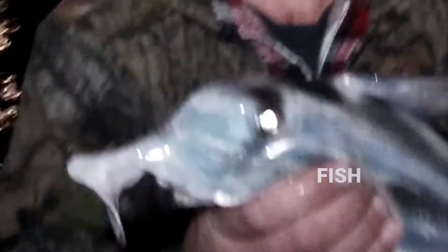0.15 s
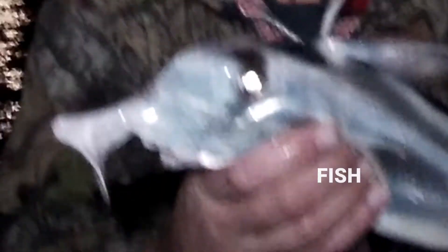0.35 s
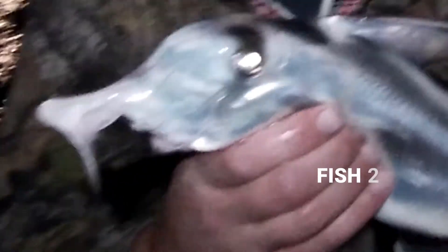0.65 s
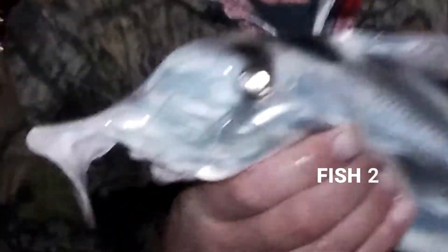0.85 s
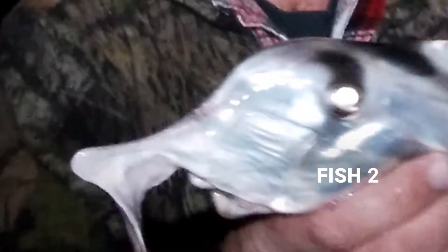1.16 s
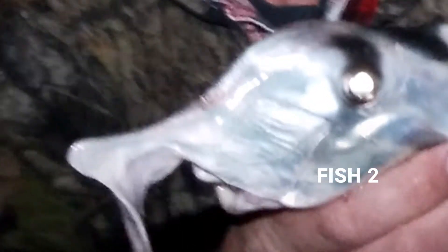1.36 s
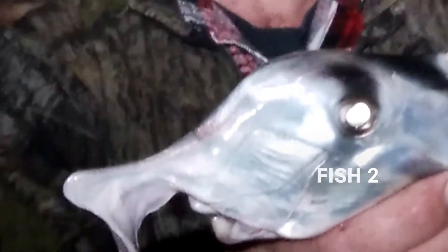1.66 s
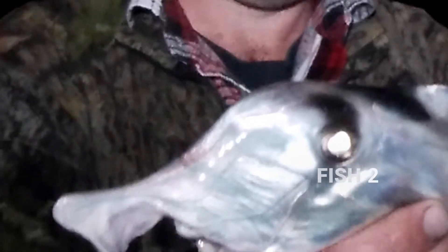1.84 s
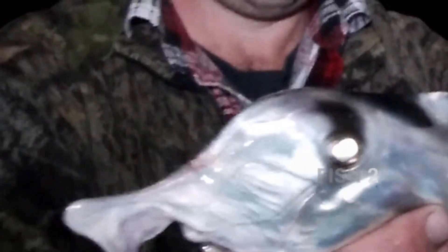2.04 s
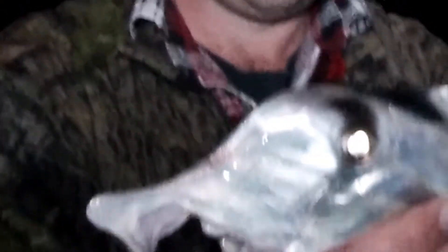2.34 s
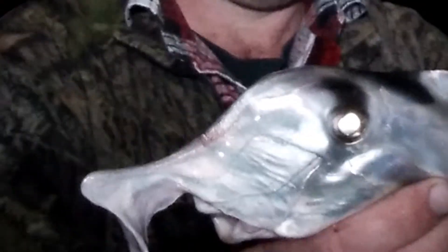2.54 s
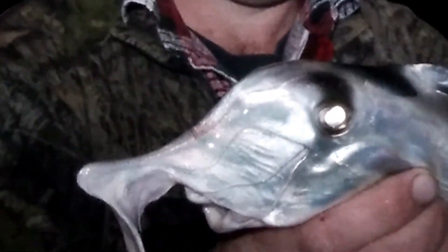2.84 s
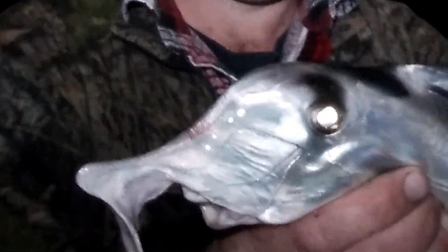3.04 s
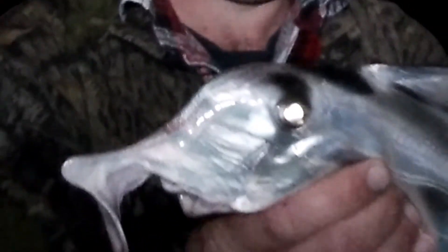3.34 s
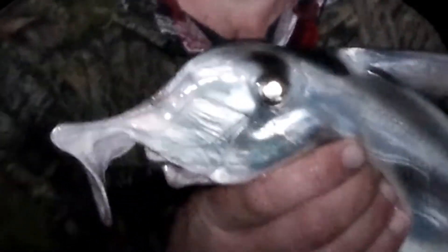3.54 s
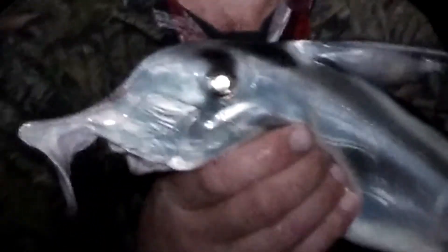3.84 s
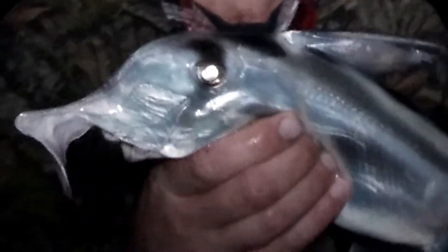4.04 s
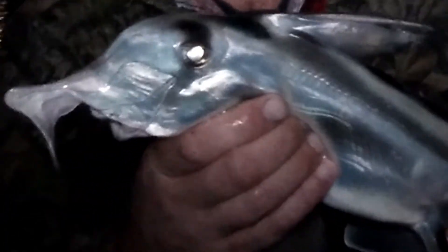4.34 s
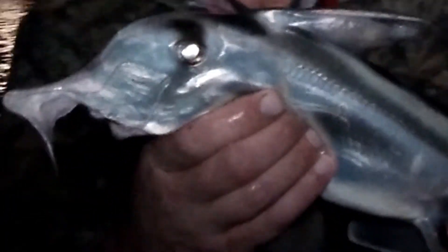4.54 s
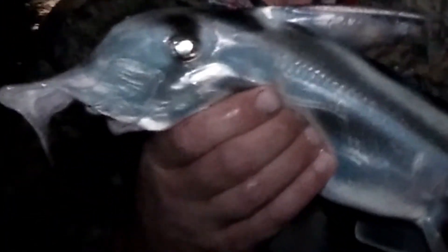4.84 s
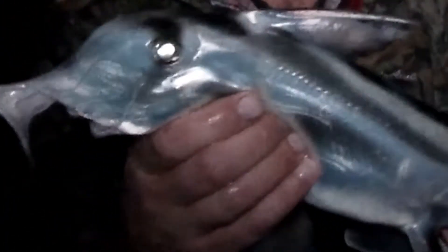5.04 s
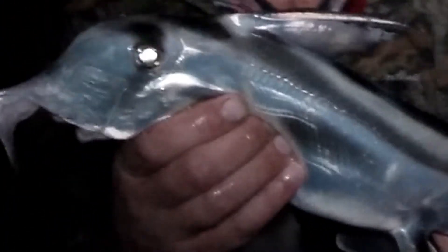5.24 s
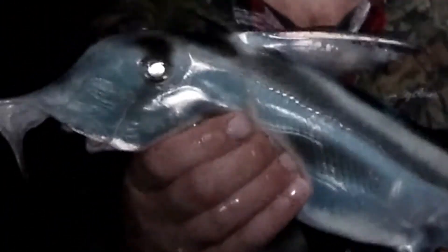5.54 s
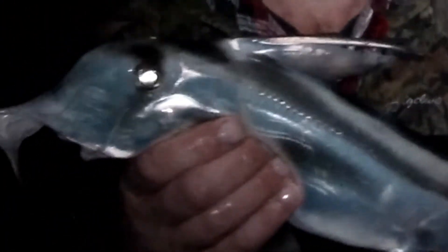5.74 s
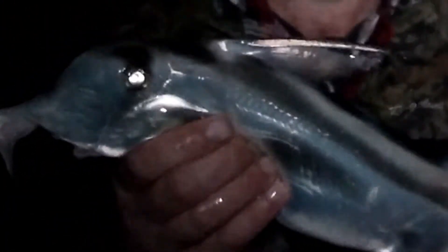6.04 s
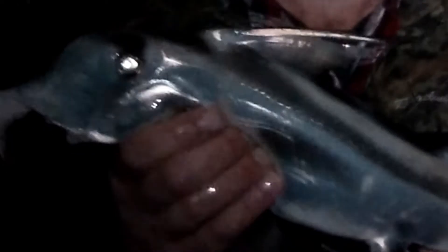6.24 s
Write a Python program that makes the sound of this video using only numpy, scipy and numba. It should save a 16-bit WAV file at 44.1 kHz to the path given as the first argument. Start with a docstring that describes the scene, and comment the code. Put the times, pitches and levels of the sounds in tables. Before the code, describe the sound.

Close wavelets fizz, plop and slap against shore stones; a low boomy rumble grows underneath until it dominates the second half.

```python
"""Shallow water laps over a pebble shore, heard close up on a small microphone: noise wash, hissing foam.
Swarms of small ringing bubbles fizz and run back over the pebbles; single air pockets plop, many upward
in pitch. Drops tick on stone as clusters of short rings, wavelets slap as spray, crack and hollow thud.
Behind them low-band noise is wind on the microphone, and resonant noise a deep rumble that swells and stays."""
import sys
import numpy as np
from scipy import signal
from scipy.fft import rfft, irfft
from scipy.io import wavfile
from scipy.ndimage import uniform_filter1d
from numba import njit

SR = 44100
rng = np.random.default_rng(int(sys.argv[2]) if len(sys.argv) > 2 else 0)


def wrap_up_sound(samples):
    """Save the sound to the file named by the first command line argument, as 16-bit audio."""
    columns = np.atleast_2d(samples).T
    # keep every value between -1 and 1, then stretch to whole-number steps
    tamed = np.clip(columns, -1, 1)
    steps = np.round(tamed * 32767).astype(np.int16)
    wavfile.write(sys.argv[1], SR, steps)


N = 281799


def water():
    """Wavelets wash and gurgle under finer foam; quick random surges lift both."""
    # wash as the wavelets come and go, before surges: (t/s, level/dB)
    wash_levels = [(0, -44.5), (.3, -43), (.75, -46), (1.3, -46.5), (1.55, -46), (1.96, -47), (2.4, -45),
                   (2.85, -45), (3.4, -46), (3.95, -47.5), (4.27, -50.5), (4.86, -51), (5.1, -46.5),
                   (5.38, -50), (5.75, -50.5), (6.1, -48), (6.39, -48)]
    # filter responses of wash and foam: (f/Hz, level/dB)
    wash_colour = [(150, -32.5), (260, 1), (480, -5.5), (780, -1), (1100, -3.5), (1550, -2), (2200, -5),
                   (3000, -10.5), (4200, -30), (7700, -38)]
    foam_colour = [(1500, -24), (2600, -14), (3200, 5.5), (4300, 2.5), (7500, 0), (9000, -1), (15000, -5)]
    surge_db = 0.15 * walk(9) + 1.51 * walk(45)

    body = hiss(180, 8000, 0.73)
    body += undb(-1.0) * fizz(count=3500, lo_hz=400.8, hi_hz=4944, cycles=30.0, spread_db=1.0, glide=0.0063)
    # larger pockets of air ring longer and slide up as they rise
    body += undb(-14.5) * fizz(count=250, lo_hz=544.7, hi_hz=1895, cycles=95, spread_db=3.0, glide=0.00867)
    foam = hiss(2400, 17000, 1.0)
    foam += fizz(count=5000, lo_hz=2440, hi_hz=13530, cycles=43.0, spread_db=3.0, glide=0.007)

    wash_db = curve(wash_levels)
    # foam is -51.5 dB at a wash of -46 dB and moves 1.31 dB per dB of wash
    foam_db = -51.5 + 1.31 * (wash_db + 46)
    wash = undb(wash_db + surge_db) * unit(shape(body, wash_colour))
    return wash + undb(foam_db + 1.17 * surge_db) * unit(shape(foam, foam_colour))


def hiss(lo_hz, hi_hz, flicker_db):
    """Half-octave noise bands, each flickering alone."""
    out = 0
    for hz in np.exp(np.arange(np.log(lo_hz), np.log(hi_hz), np.log(2) / 2)):
        band = unit(svf(rng.standard_normal(N), hz, hz / 2))
        # the root of the pitch keeps the power per Hz even
        out = out + np.sqrt(hz) * undb(flicker_db * walk(6.8)) * band
    return unit(out)


def fizz(count, lo_hz, hi_hz, cycles, spread_db, glide):
    """A swarm of bubbles of many sizes, each a short ring; a few are much louder than the rest."""
    when, pitch, loud, length = rng.random((count, 4)).T
    hz = lo_hz * (hi_hz / lo_hz) ** pitch
    size = undb(-spread_db * np.log(1 - .995 * loud)) * hz
    ring_s = cycles * (.5 + length) / hz
    return unit(rings(when * N / SR, size, hz, glide * hz * length, ring_s, rise=0.00026, hold=1.13))


def backwash():
    """Thin sheets of water run back over the pebbles: dense small bubbles round one pitch swell and ebb."""
    # runs: (t/s, length/s, level/dB, f/Hz)
    sheets = [(0.065, 0.51, -52.5, 2960), (1.397, 0.23, -51, 7300), (1.55, 0.6, -59, 4700),
              (3.34, 0.19, -50.5, 3240), (5.756, 0.86, -57, 3540)]
    width_hz, edge_s = 1100., 0.12
    t = np.arange(N) / SR
    bubbles = fizz(count=10000, lo_hz=2000, hi_hz=9160, cycles=25.0, spread_db=2.0, glide=0.0054)
    out = np.zeros(N)
    for start, length, db, hz in sheets:
        swell = np.clip(np.minimum(t - start, start + length - t) / edge_s, 0, 1)
        out += undb(db) * swell * unit(svf(bubbles, 1. * hz, width_hz))
    return out


def plops():
    """Air pockets open with a short wet smack and ring, most upward; the churning surface makes them warble."""
    # air pockets: (t/s, level/dB before the warble, f/Hz, glide/octaves per s, ring/s to -60 dB)
    pockets = [(0.15, -33, 1270, 0, .03), (.235, -41, 725, 4.5, 0.16), (0.286, -31, 3070, 3, 0.02),
               (.345, -38, 704, -1, 0.046), (0.367, -34, 1650, -12, 0.022), (.385, -37, 625, 2, 0.028),
               (.49, -31.5, 756, -3, 0.029), (.545, -30.5, 1410, -5, 0.015), (.623, -35, 660, 5, 0.083),
               (.742, -36.5, 640, 7.5, 0.12), (.849, -32.5, 1490, 1, 0.029), (1.723, -38, 507, 4, 0.13),
               (1.726, -33, 1270, 2, 0.022), (1.82, -30.5, 1415, 11, 0.033), (2.244, -36, 564, 33, 0.044),
               (2.76, -43, 648, -2, .05), (2.713, -29, 1020, -7, 0.021), (2.779, -32.5, 1405, 19.5, 0.065),
               (2.849, -35, 700, 3.5, 0.064), (2.91, -32, 2040, 4, 0.017), (2.925, -34, 1035, 24, 0.033),
               (2.994, -30, 533, 6.5, 0.067), (3.018, -38, 590, 21, 0.079), (3.055, -40, 990, -1, .045),
               (3.152, -35.5, 925, 3.5, 0.065), (3.194, -40.5, 775, 9.5, .07),
               (3.197, -38, 1150, 25.5, 0.048), (3.284, -34, 1375, 1, 0.029), (3.388, -41, 850, -2, 0.033),
               (3.418, -35, 1156, 4.5, 0.05), (3.448, -27, 1346, 3, 0.016), (3.417, -33, 2050, 0, 0.013),
               (3.475, -32, 2280, 15, .012), (3.528, -36, 1140, 10, .015), (3.464, -34, 893, 8, 0.086),
               (3.47, -35, 1330, 6, 0.047), (3.635, -39, 1406, 12, 0.051), (3.762, -35, 846, 11, 0.029),
               (4.05, -39, 810, 16, 0.037), (4.42, -35.5, 593, 20, 0.072), (4.523, -35, 645, 12, 0.042),
               (4.62, -36.5, 1740, 4, 0.015), (4.746, -35.5, 2200, 6, 0.011),
               (4.919, -34.5, 868, -1.5, 0.041), (4.938, -35, 940, 26, 0.025), (5.027, -35, 730, 3, 0.032),
               (5.081, -32, 1630, 8, 0.014), (5.146, -40, 400, 17, 0.14), (5.21, -38, 756, 4, .04),
               (5.225, -41, 1260, -3, 0.074), (5.335, -42, 710, 3.5, 0.098), (5.476, -28, 1190, 4, 0.0067),
               (5.648, -38, 2210, 6, 0.017), (5.86, -38, 910, 3, 0.02), (5.985, -38, 740, 9, 0.022),
               (6.0, -37, 820, 2, 0.025), (6.043, -32.5, 2250, 10, 0.016), (6.113, -33, 2160, -4, 0.016),
               (6.146, -36, 1480, 1, .03), (6.195, -35, 706, 9, 0.035), (6.21, -45, 846, 18.5, 0.17),
               (6.352, -44, 747, 20, 0.048), (5.5, -35.5, 1200, 5, 0.0092)]
    s, db, hz, glide, ring = np.transpose(pockets)
    smack = rings(s, undb(db - 10.5), 1.7 * hz, 0 * s, 0 * s + 0.0037, rise=0.00012, hold=1.5)
    warble = undb(2.4 * walk(130) - 4)
    return smack + warble * rings(s, undb(db), hz, glide, ring, rise=0.0005, hold=2.1)


def ticks():
    """Each drop on stone bursts into a few short rings scattered round its pitch, under a broad click."""
    # drops: (t/s, level/dB of the click, f/Hz)
    drops = [(.185, -34, 2500), (.415, -32.5, 2750), (.719, -37.5, 2820), (0.344, -34, 3680),
             (0.478, -38, 5600), (0.755, -37.5, 4600), (0.8937, -36, 6400), (0.9348, -30, 6900),
             (1.102, -36, 5540), (1.1828, -34.5, 5940), (1.2376, -36.5, 7250), (1.264, -31.5, 5560),
             (1.271, -35.5, 7200), (1.3517, -38.5, 7000), (1.4085, -29, 7300), (1.4205, -36, 7050),
             (1.459, -37.5, 4700), (1.516, -39, 7200), (1.657, -44, 6100), (1.927, -40, 4530),
             (1.964, -39.5, 8200), (1.9972, -39, 3860), (2.318, -44, 6900), (2.3563, -38, 8340),
             (2.626, -42, 7600), (2.7123, -36, 4270), (2.713, -38, 7800), (2.741, -46, 8500),
             (2.804, -35, 4270), (2.761, -36, 3030), (2.838, -34, 3180), (2.972, -35, 2630),
             (3.153, -32, 2600), (3.1183, -32.5, 3820), (3.16, -37.5, 5550), (3.2014, -39, 3830),
             (3.237, -32, 5900), (3.282, -31, 5100), (3.3103, -40.5, 4900), (3.391, -48, 4600),
             (3.399, -41, 4160), (3.417, -40, 3900), (3.518, -40, 3800), (3.4665, -38, 4070),
             (3.5367, -35.5, 3940), (3.5794, -38, 3500), (3.749, -30.5, 5940), (3.785, -37.5, 5800),
             (3.858, -33, 2200), (3.9843, -32.5, 4570), (4.0476, -36, 5500), (4.413, -40.5, 6000),
             (4.4813, -38, 3780), (4.5528, -38, 7600), (4.7464, -42, 5400), (4.8085, -38.5, 6350),
             (4.848, -33.5, 4380), (4.9245, -41.5, 6800), (4.954, -37, 3480), (5.0998, -37, 4200),
             (5.1574, -38, 4220), (5.567, -43, 3200), (5.582, -49, 3300), (5.7447, -41.5, 3200),
             (5.9684, -41, 3400), (5.9177, -38, 6950), (6.043, -39.5, 3740), (6.199, -36.5, 5200),
             (6.2418, -37.5, 3700)]
    s, db, hz = np.transpose(drops)
    steady = 0 * s
    c = rng.random((len(s), 8)).T
    out = rings(s, undb(db - 2.0), hz, steady, steady + 0.0078, rise=0.000092, hold=1.24)
    out += rings(s, undb(db), hz, steady, steady + 0.00086, rise=.0001, hold=2.05)  # click
    for k in range(4):
        late = s + 0.0065 * c[k]
        near_hz = hz * 2 ** (1.89 * (c[k + 4] - .5))
        out += rings(late, undb(db - 3.0), near_hz, steady, steady + 0.0059, rise=0.000089, hold=1.15)
    return out


def slaps():
    """A burst of spray, a crack if the blow is sudden, and the thud of the hollow that closes under it."""
    # wavelets on stones: (t/s, level/dB, hollow f/Hz, hollow level/dB re the slap, rise/s)
    blows = [(.135, -36, 703, -16, 0.014), (0.674, -29, 1670, -6, 0.00055), (.885, -31, 2020, -14, 0.016),
             (.933, -25, 1920, -17, 0.0023), (.911, -43, 583, 9, 0.0022), (.943, -23, 480, -7, 0.001),
             (.964, -24, 500, -7, 0.001), (1.045, -26, 520, -5, 0.0006), (1.1455, -19, 400, -5, 0.0004),
             (1.153, -29, 930, -6, 0.0012), (1.178, -28, 347, -11.5, 0.014),
             (1.47, -35.5, 1210, -18, 0.023), (1.866, -34, 1536, -9, 0.0048),
             (2.2485, -23, 774, -18.5, 0.001), (2.991, -35.5, 804, 5.5, 0.0014),
             (3.395, -40.5, 2000, -17, 0.046), (3.752, -31.5, 398, -18, 0.0012),
             (4.847, -26.5, 1900, -10, 0.00045), (4.886, -30, 686, -18, 0.0052),
             (5.083, -30.5, 600, -33, 0.0014), (5.123, -42, 318, 12, 0.0033), (5.445, -35, 930, -9, 0.011),
             (5.49, -36, 1006, -14, .008)]
    # filter response of the spray: (f/Hz, level/dB)
    spray_colour = [(200, -8.5), (450, 0), (1500, -3.5), (2300, -5), (3500, -16), (15000, -39.5)]
    out = np.zeros(N)
    spray = unit(shape(rng.standard_normal(N), spray_colour)) * undb(3 * walk(200))
    t = np.arange(int(.15 * SR)) / SR
    for s, db, hz, hollow_db, rise in blows:
        i = int(s * SR)
        fade_s = 0.018 + 14 * rise  # to -60 dB: a slap that rises slowly also dies slowly
        fade = np.minimum(t / max(rise, .0003), 1) * 1000. ** (-np.maximum(t - rise, 0) / fade_s)
        crack = np.cos(2 * np.pi * 1200 * t) * np.exp(-t / 0.00023) * np.exp(-rise / 0.003)
        hollow = undb(hollow_db) * np.sin(2 * np.pi * hz * t)
        out[i:i + len(t)] += undb(db) * fade * (undb(-9.5) * spray[i:i + len(t)] + crack + hollow)
    return out


def rumble():
    """Deep noise booming in fixed bands; all groups follow one swell, each between its own two levels."""
    # resonances: (f/Hz, width/Hz before boom() widens it, level/dB)
    boom_bands = [(71.6, 13.6, 1.5), (98.5, 17.4, -2), (129, 24, -1.44)]
    deep_bands = [(32.7, 18.4, -1), (50, 8.4, -19)]
    upper_bands = [(169.7, 23.6, -3.5), (191.9, 17.4, 0), (231.8, 32.5, -4.5), (270, 97, -15.5),
                   (312, 30, -15.5)]
    out = swelling(calm_db=-57.5, full_db=-23.5) * boom(boom_bands)
    out += swelling(calm_db=-55, full_db=-31) * boom(deep_bands)
    out += swelling(calm_db=-55, full_db=-37) * boom(upper_bands)
    return out


def boom(bands):
    """Noise through a few narrow resonances, each applied twice."""
    out = np.zeros(N)
    for hz, width, db in bands:
        wide = 1.43 * width  # the second pass narrows the band again
        once = svf(rng.standard_normal(N), 1. * hz, wide)
        out += undb(db) * unit(svf(once, 1. * hz, wide))
    return unit(out)


def swelling(calm_db, full_db):
    """Gain that moves from the calm to the full level as the rumble swells."""
    # the rumble swells up and stays: (t/s, share of the full swell)
    swell = [(0, 0), (1.2, 0.21), (2.0, 0.35), (2.35, 0.35), (2.7, 0.51), (3.05, 0.58), (3.6, 0.78),
             (4.05, 1), (4.7, 1.01), (5.1, 0.93), (5.4, 1), (6.39, 0.9)]
    return undb(calm_db + (full_db - calm_db) * curve(swell))


def wind():
    """Air pressing on the diaphragm, as noise round 10 Hz; its level falls while the rumble's level rises."""
    push = svf(svf(rng.standard_normal(N), 10.8, 7.1), 8.0, 23.0)
    return swelling(calm_db=-33, full_db=-45) * unit(push)


def undb(db):
    """Decibels to gain."""
    return 10 ** (np.asarray(db) / 20)


def unit(x):
    """Scale to rms 1."""
    return x / np.sqrt(np.mean(x ** 2))


def curve(table):
    """The second column of a table against time, one value per sample."""
    s, value = np.transpose(table)
    return np.interp(np.arange(N) / SR, s, value)


def walk(rate):
    """Random levels held 1 / rate s and smoothed twice; rms 1."""
    k = int(SR / rate)
    steps = np.repeat(rng.standard_normal(N // k + 1), k)
    return unit(uniform_filter1d(uniform_filter1d(steps, k), k)[:N])


def shape(x, colour):
    """Filter by a response of (f/Hz, level/dB) points."""
    hz, db = np.transpose(colour)
    # margins that carry the slope on keep the two ends apart
    edge = SR // 2
    margins = [(0, 0)] * (x.ndim - 1) + [(edge, edge)]
    wide = np.pad(x, margins, mode="reflect", reflect_type="odd")
    f = np.maximum(np.fft.rfftfreq(N + 2 * edge, 1 / SR), 1)
    gain = undb(np.interp(np.log(f), np.log(hz), db))
    return irfft(rfft(wide) * gain, N + 2 * edge)[..., edge:edge + N]


@njit
def svf(x, hz, width):
    """State-variable band-pass, gain 1 at the centre."""
    y, band, low = np.empty(len(x)), 0., 0.
    g, k = np.tan(np.pi * hz / SR), width / hz
    for i in range(len(x)):
        v = (band + g * (x[i] - low)) / (1 + g * (g + k))
        band, low, y[i] = 2 * v - band, low + 2 * g * v, k * v
    return y


@njit
def rings(s, size, hz, glide, ring, rise, hold):
    """Gliding sines, cut off at -60 dB after ring seconds; a larger hold delays the decay."""
    out = np.zeros(N)
    for k in range(len(s)):
        start, phase, f = int(s[k] * SR), 0., hz[k]
        up, span = 2 ** (glide[k] / SR), ring[k] * SR
        for i in range(min(int(span), N - start)):
            fade = min((i + 1) / (rise * SR), 1.) * 1000. ** -(i / span) ** hold
            out[start + i] += size[k] * np.sin(phase) * fade
            phase += 2 * np.pi * min(f, .45 * SR) / SR
            f *= up
    return out


def scene():
    """Near events get a short scatter from the stones around them; the other layers stay dry."""
    near = plops() + ticks() + slaps()
    t = np.arange(int(.08 * SR)) / SR
    scatter = rng.standard_normal(len(t)) * 1000. ** (-t / 0.25)
    scatter /= np.sqrt(np.sum(scatter ** 2))
    near = near + undb(-9.5) * signal.fftconvolve(near, scatter)[:N]
    return (water() + backwash() + near + rumble() + wind())[None]


def record(dry):
    """The small microphone fades above its port resonance; the recorder rounds loud peaks and cuts the top."""
    # microphone response: (f/Hz, level/dB)
    microphone = [(4, -1.5), (7700, 1), (8700, -8), (11000, -18), (15000, -29.5), (22050, -50.5)]
    rounded = np.tanh(3 * shape(dry, microphone)) / 3
    top_cut = signal.ellip(8, .2, 70, 15300, fs=SR, output="sos")  # low-pass at 15300 Hz
    return signal.sosfilt(top_cut, rounded)


dry = scene()
out = record(dry)
wrap_up_sound(out)
```